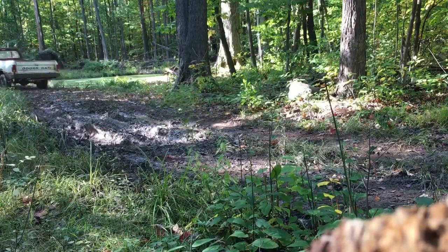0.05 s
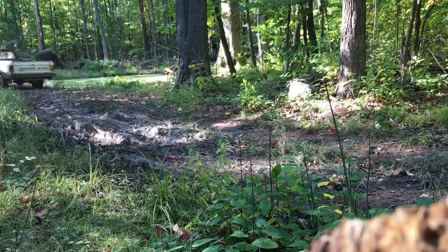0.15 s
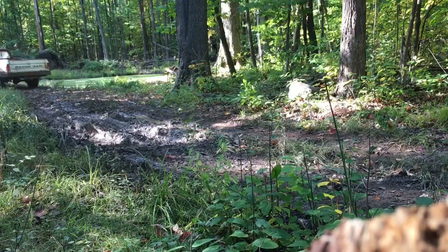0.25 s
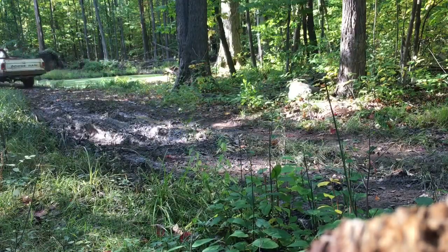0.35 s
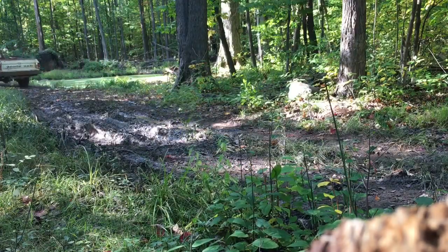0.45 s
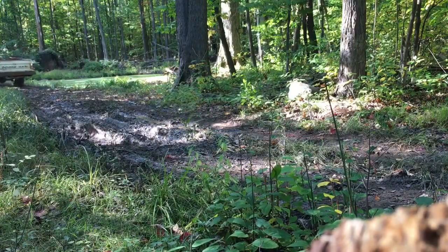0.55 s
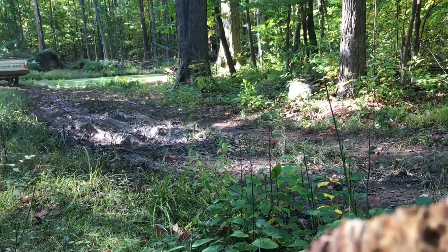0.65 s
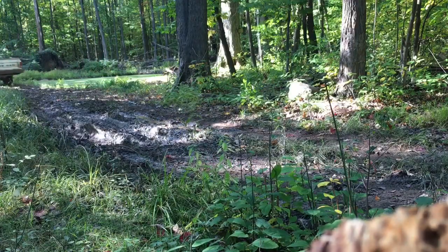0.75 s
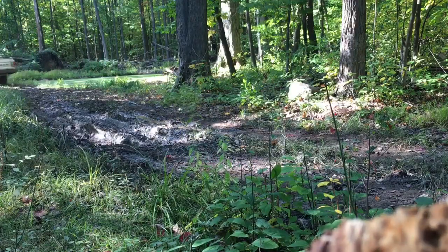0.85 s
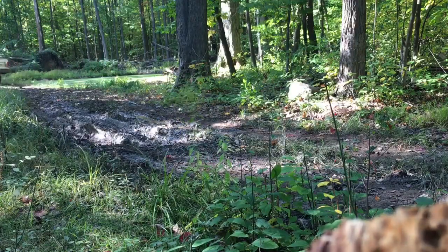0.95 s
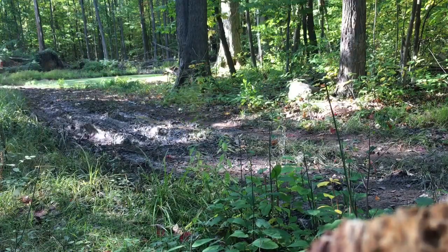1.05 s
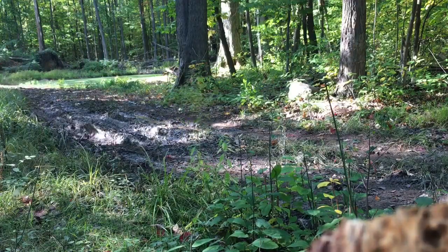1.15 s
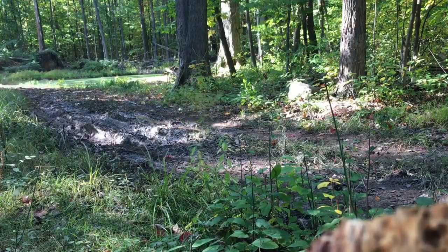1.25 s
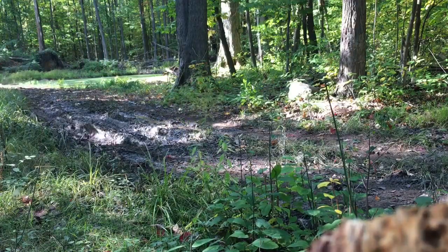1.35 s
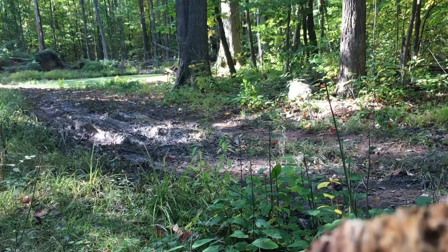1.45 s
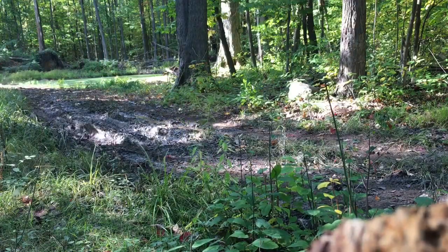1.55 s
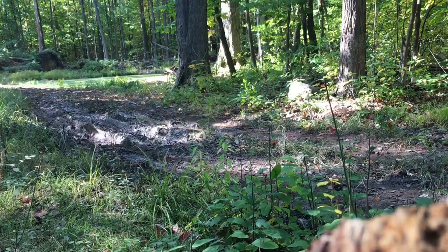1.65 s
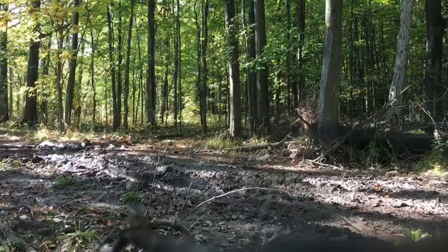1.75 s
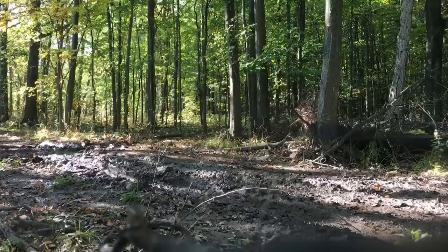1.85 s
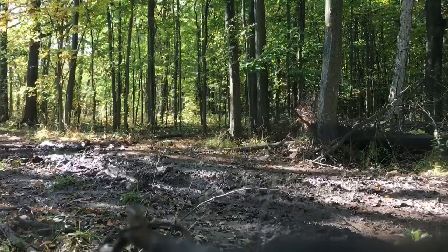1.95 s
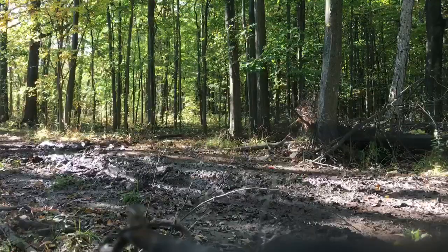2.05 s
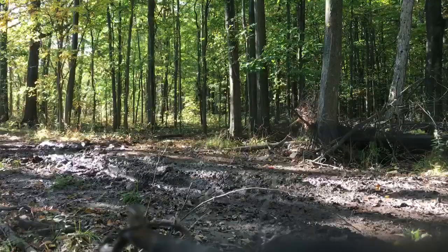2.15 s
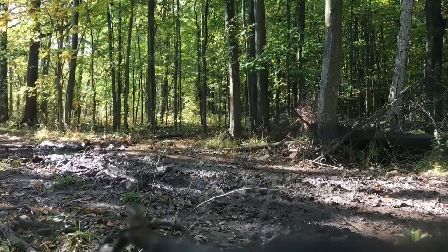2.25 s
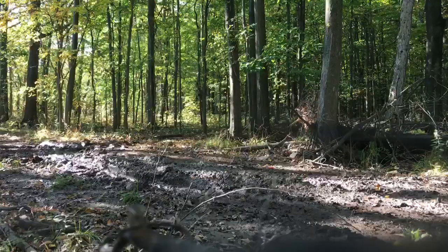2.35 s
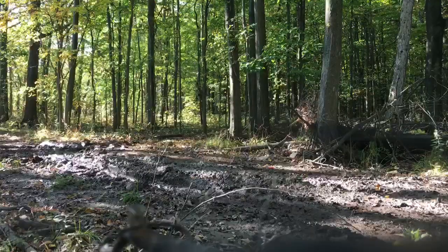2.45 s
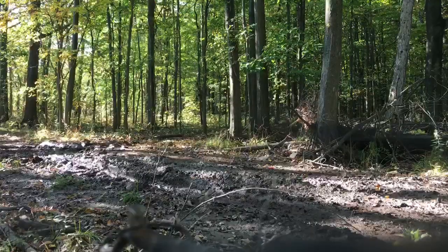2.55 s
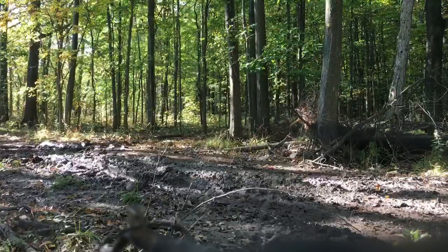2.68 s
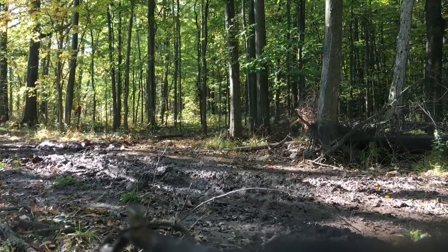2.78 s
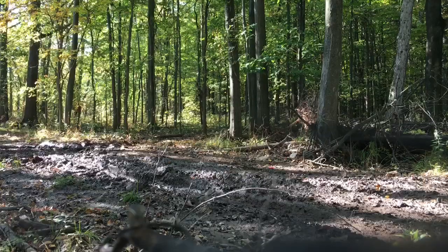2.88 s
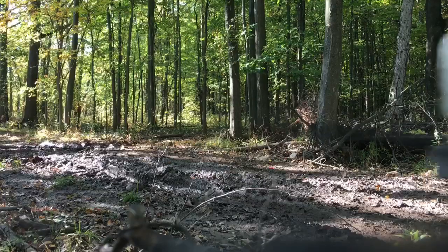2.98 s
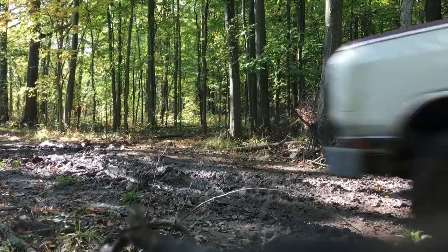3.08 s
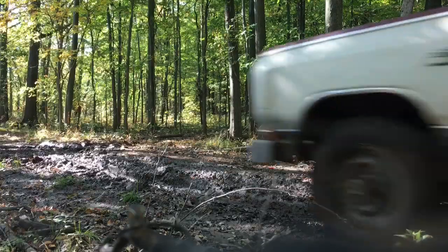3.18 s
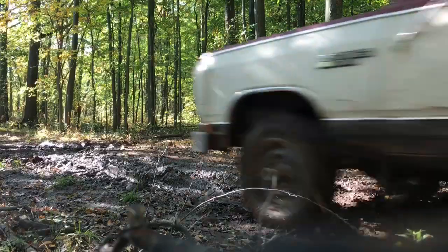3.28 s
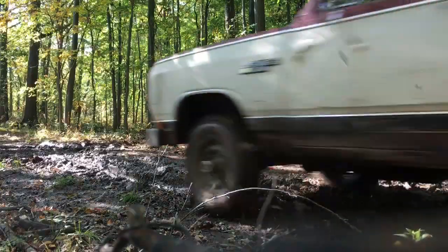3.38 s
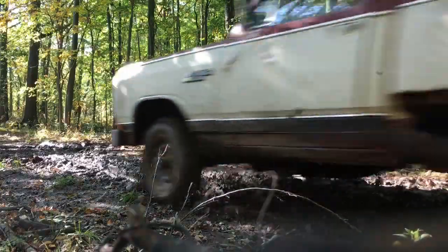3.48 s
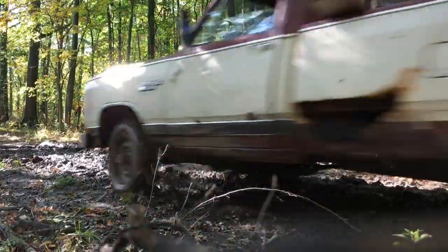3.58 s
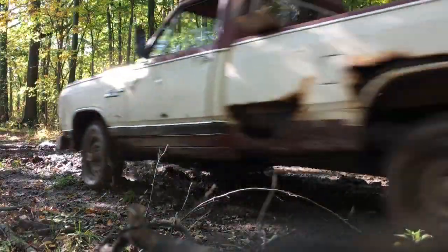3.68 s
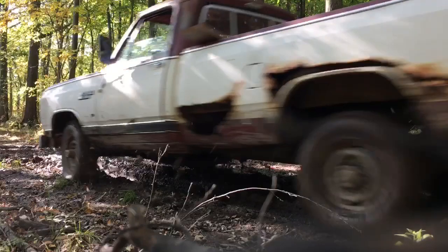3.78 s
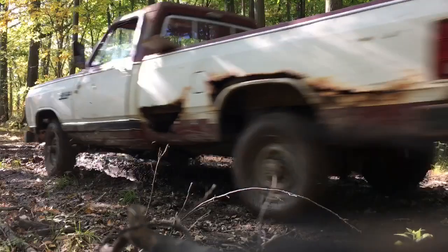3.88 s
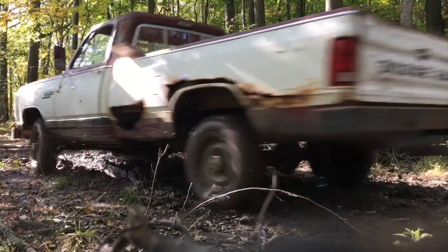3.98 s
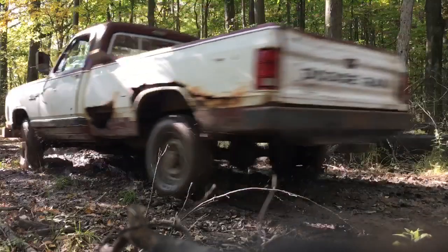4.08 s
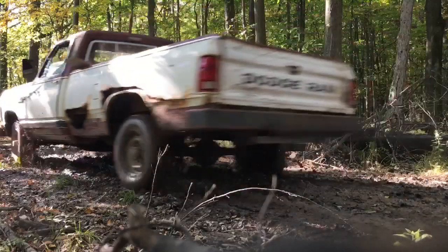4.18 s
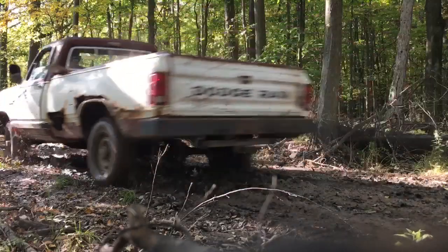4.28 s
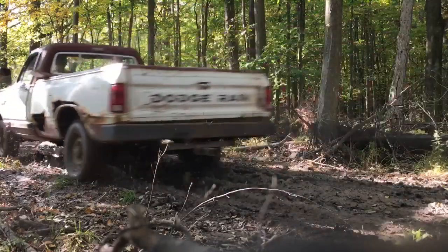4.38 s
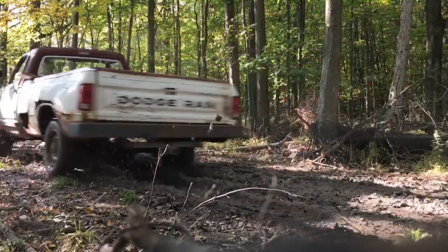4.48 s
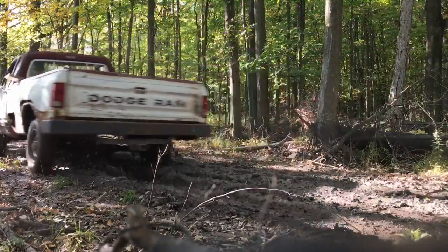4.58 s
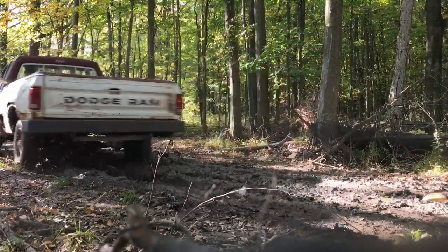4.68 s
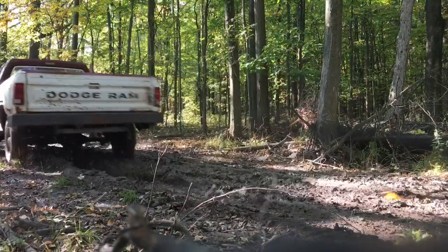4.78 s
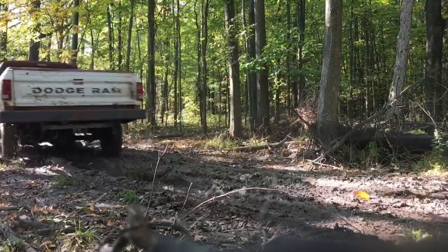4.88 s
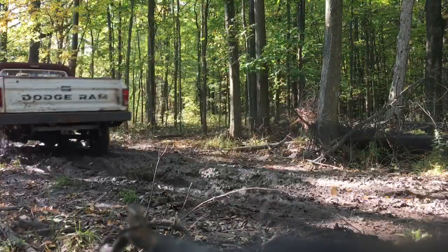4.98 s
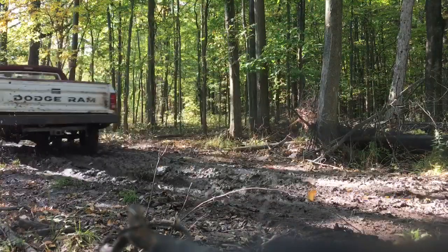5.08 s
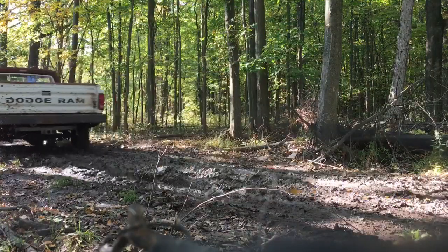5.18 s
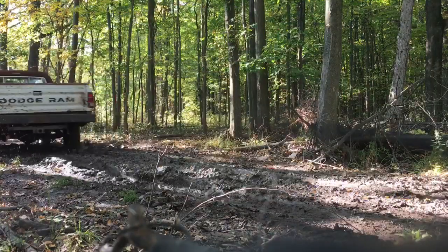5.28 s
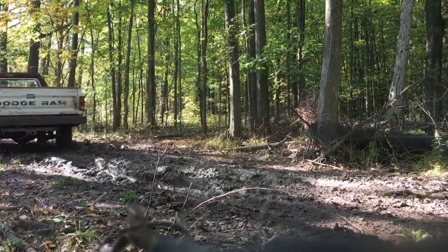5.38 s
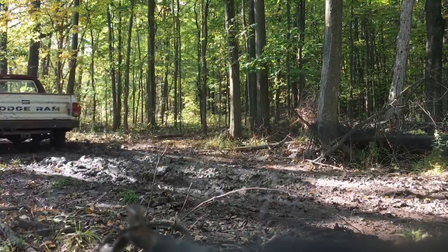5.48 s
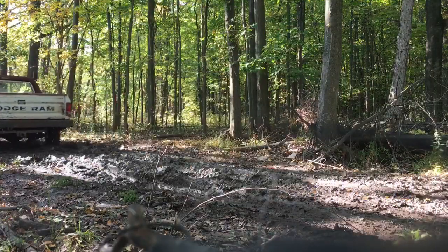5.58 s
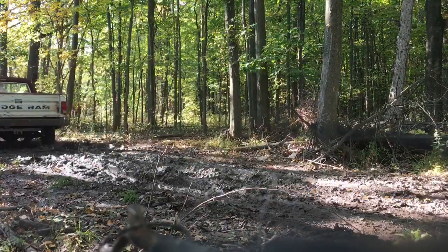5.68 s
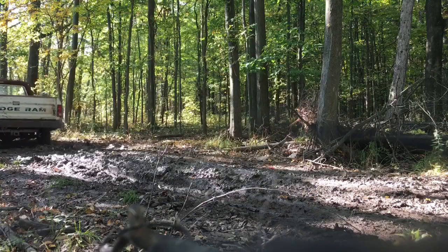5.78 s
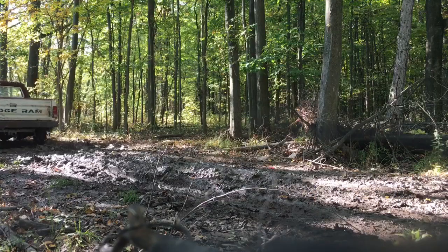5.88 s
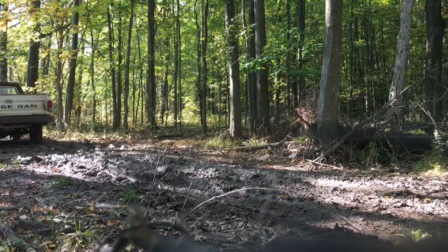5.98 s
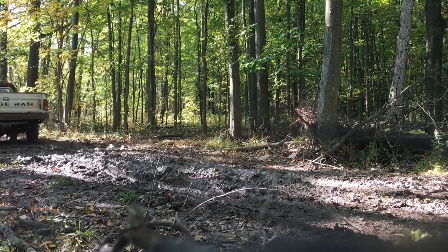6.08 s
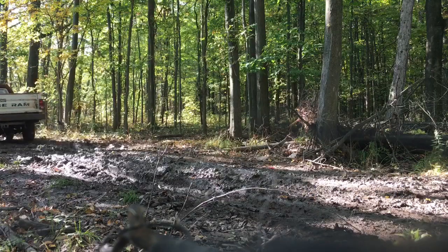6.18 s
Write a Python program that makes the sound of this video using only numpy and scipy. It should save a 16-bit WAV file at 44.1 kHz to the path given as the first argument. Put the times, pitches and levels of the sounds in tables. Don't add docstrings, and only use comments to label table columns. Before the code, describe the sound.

An old eight-cylinder pickup burbles away through woods, cuts abruptly, then roars close past with rattling panels and churning mud, pulling away with stuttering revs.

```python
import sys
import numpy as np
from scipy import signal
from scipy.io import wavfile
from scipy.ndimage import uniform_filter1d

SR = 44100
rng = np.random.default_rng(int(sys.argv[2]) if len(sys.argv) > 2 else 0)


def int16_out(signal):
    q = np.round(np.clip(np.atleast_2d(signal).T, -1, 1) * 32767)
    wavfile.write(sys.argv[1], SR, q.astype(np.int16))


def elevation(decibels):
    levels = np.asarray(decibels, float)
    return 10 ** (levels / 20)


N = 274724
TIME = np.arange(N) / SR
CUT_S = 1.702

# time in seconds, engine cycles per second (eight firings a cycle).
SPEED = [(0.0, 23.7), (0.24, 20.2), (0.64, 19.9), (0.81, 16.7), (1.12, 18.1), (1.26, 15.2), (1.69, 12.7),
         (1.71, 15.0), (2.5, 15.3), (2.9, 16.7), (3.2, 17.35), (4.0, 23.7), (4.6, 24.5), (5.45, 24.8),
         (5.71, 23.8), (5.8, 21.9), (6.0, 21.0), (6.23, 22.5)]
BANK = np.array([1, -1, .7, -.7, -1, 1, -.7, .7])
LAME = np.array([0, -.5, 0, 1, 0, -.5, 0, 1])
LEAKY = [0.034, 0.02, 0.91, 0.031, 0.045, 0.98, 0.076, 0.39]
# time in seconds, view (0 afar, 1 front, 2 behind).
VIEW = [(CUT_S, 0), (CUT_S + .001, 1), (3.0, 1), (3.55, 2)]
# time in seconds, pipes in dB, wheels in dB.
DRIVE = [(0, -29, -49.5), (.45, -27.5, -51), (.63, -31, -52), (.71, -37.5, -59), (.95, -33, -56),
         (1.3, -43, -62), (1.69, -51, -66.5), (1.712, -20, -43.5), (2.1, -19, -44.5), (2.45, -16, -41.5),
         (2.72, -17, -30), (3.05, -12.5, -25.5), (3.45, -18.5, -25.5), (3.8, -20.5, -35), (4.05, -25, -38),
         (4.45, -26.5, -41.5), (5.7, -27.5, -45), (6.23, -26, -42.5)]
# Hz, gain in dB.
COMMON_PATHS = [
    [(30, -31), (50, 4.5), (90, 0), (130, 7), (170, 4), (230, -14), (320, -24.5), (1000, -40.5),
     (3000, -60)],
    [(30, -23), (50, 35), (75, 22), (130, 12.5), (180, 14.5), (260, -2.5), (400, -16.5), (1000, -52),
     (3000, -88)],
    [(30, -38), (50, -5), (100, 10), (150, 3), (200, -2), (250, -7), (330, -15), (420, -25), (1000, -40.5),
     (3000, -48.5)],
]
# Hz, gain in dB.
BEAT_PATHS = [
    [(30, -66.5), (62, -2.5), (100, 0), (160, 3.5), (220, -1), (265, -5.5), (330, -24), (400, -16.5),
     (1000, -38), (3000, -66)],
    [(30, -40), (46, -31), (62, 2.5), (78, 0), (125, -10), (170, -13), (220, -9), (300, -18.5), (450, -35),
     (1000, -39), (3000, -63.5)],
    [(30, -24), (48, 5), (70, 8.5), (120, 4), (165, -3), (260, 2.5), (320, -2.5), (420, -9.5), (520, -28),
     (1000, -18), (3000, -60)],
]
# start in seconds, length in seconds, level in dB.
PULLS = [(.2, 0.28, -19), (.6, 0.058, -20), (.73, 0.19, -24.5), (.89, 0.22, -21.5), (1.19, 0.22, -27.5),
         (1.43, 0.13, -28), (2.2, 0.29, -22), (2.58, 0.15, -23), (2.8, 0.34, -14), (3.13, 0.32, -15),
         (3.47, 0.1, -18), (3.6, 0.23, -15), (3.85, 0.11, -18), (3.95, 0.185, -17.5), (4.55, 0.31, -23),
         (5.57, .06, -23), (5.83, 0.1, -19.5), (5.93, 0.115, -21), (6.05, .25, -20.5)]
# start in seconds, length in seconds, level in dB.
MISFIRES = [(-.05, 0.21, -24), (0.507, 0.11, -26), (.73, 0.091, -31), (0.98, 0.033, -28),
            (1.149, 0.052, -32), (1.28, 0.053, -37), (1.47, 0.055, -44), (2.67, 0.069, -26.5),
            (3.14, 0.2, -19), (3.783, 0.069, -20), (3.974, 0.076, -23.5), (4.116, 0.53, -24),
            (4.706, 0.45, -25), (5.269, 0.46, -23.5), (5.813, 0.088, -21), (5.965, 0.48, -21.5)]
# Hz, level in dB per Hz.
ROAR = [(150, 6.5), (300, 8.5), (430, -5.5), (560, 1), (700, -6), (900, -1), (1150, -8.5), (1350, -7.5),
        (1600, -5), (1900, -12), (2600, -69)]
# resonance in Hz, width in Hz, level in dB.
HOLLOWS = [(439, 58, -22.5), (700, 47, -19.5), (898, 31, -25), (1156, 100, -22)]
# start in seconds, length in seconds, change in dB.
ROAR_SWELLS = [(-.02, 0.026, 14), (0.056, 0.12, 9.5), (.28, .03, 7), (2.62, 0.34, 0.5), (3.193, 0.65, -3),
               (4.45, 0.17, 0.5), (5.194, 0.32, 3), (5.982, 0.34, 2), (4.175, 0.068, 4.5), (4.93, 0.18, 3.5),
               (5.54, 0.096, 5), (5.803, 0.078, 9.5)]
# Hz, level in dB per Hz.
CHURN = [(800, -17.5), (1300, -3.5), (1700, 2), (2400, 4), (3500, 2.5), (4300, -4), (5500, -16),
         (7500, -38)]
# Hz, level in dB per Hz.
SPRAY = [(2500, -25), (4000, -7.5), (5500, -2.5), (7000, -6.5), (7600, -10), (9000, -9), (10400, -17),
         (11500, -13.5), (15700, -23)]
# start in seconds, length in seconds, change in dB.
BITES = [
    (-.02, 0.014, 4),
    (.07, 0.041, 3.5),
    (.46, .17, 4),
    (.865, 0.25, 8),
    (2.3, .05, -1),
    (2.42, 0.17, 1),
    (5.0, .25, 1),
    (5.69, .1, -4.5),
    (5.87, 0.054, -2.5),
    (6.07, 0.021, 4),
]
# Hz, level in dB per Hz.
JET = [(2500, -53), (4500, 5), (6000, 3.5), (7600, -0.5), (9000, 1), (10400, -6.5), (12000, -3),
       (15700, -13)]
# resonance in Hz, width in Hz, level in dB.
PANELS = [(1550, 110, -2), (2150, 110, -3), (2330, 110, 4), (2520, 90, -3), (2840, 110, -1),
          (3100, 120, -5), (3650, 110, -5)]
# time in seconds, level in dB.
RATTLE = [(2.5, -60), (3.0, -29), (3.45, -26), (3.65, -24), (3.78, -25), (3.85, -36), (4.1, -35),
          (4.4, -48), (6.23, -50)]
# start in seconds, peak in dB, brightness in Hz, 60 dB decay in seconds.
SPLATS = [(0.0744, -30, 6000, 0.04), (0.276, -33, 5700, 0.04), (0.285, -16.5, 2600, 0.055),
          (0.5094, -39, 5970, 0.04), (0.8744, -34, 6040, 0.04), (2.3166, -20, 6000, 0.054),
          (2.3396, -16, 6030, 0.04), (2.4493, -13, 6000, 0.03), (4.3011, -23, 6000, 0.04),
          (4.4273, -4, 2600, 0.023), (4.5077, -28, 6000, 0.04), (4.9222, -23, 6000, 0.05),
          (5.7844, -31, 6000, 0.04), (5.813, -23, 6000, 0.04), (5.929, -18, 6000, 0.04),
          (6.0447, -30, 6000, 0.04), (6.0756, -19, 6000, 0.056)]
# start in seconds, level in dB, pitch in Hz, length in seconds.
TWEET = (5.125, -52, 15500, .04)

# dB per dB, then offset in dB from afar, from the front, from behind.
FIRING_LAW = (0.34, -16, -18.5, -17.5)
ROAR_LAW = (0.5139, -13.5, -10, -9)
CHURN_LAW = (0.81, -2.4, -3.9, -0.86)
LEAK_LAW = (.5, 13, 14, 10)

GUST_DB, GUST_S = 1.53, 0.017


def evened(x):
    return x / np.sqrt(np.mean(x ** 2) + 1e-20)


def read(points, hz):
    f, value = np.transpose(points)
    return np.interp(np.log(hz + 1), np.log(f + 1), value)


def curves(rows):
    s, *columns = np.transpose(rows)
    return [np.interp(TIME, s, column) for column in columns]


def seen(values):
    return np.interp(curves(VIEW)[0], range(len(values)), values)


def follow(control_db, law):
    return law[0] * control_db + seen(law[1:])


def waver(seconds):
    width = int(seconds * SR)
    drift = uniform_filter1d(rng.standard_normal(N), width)
    return evened(uniform_filter1d(drift, width))


def spells(rows, rise_s, fall_s):
    start, length, db = np.transpose(rows)[:, :, None]
    rise = (TIME - start) / rise_s + .5
    fall = (start + length - TIME) / fall_s + .5
    return np.clip(np.minimum(rise, fall), 0, 1), db


def causal(x, points):
    hz = abs(np.fft.fftfreq(16384, 1 / SR))
    log_gain = np.log(elevation(read(points, hz)))
    taps = np.fft.ifft(np.exp(np.conj(signal.hilbert(log_gain)))).real[:6000]
    return signal.oaconvolve(x, taps)[:N]


def resonate(x, hz, width):
    turn = np.exp(2j * np.pi * hz * TIME)
    r = np.exp(-np.pi * width / SR)
    return 2 * (turn * signal.lfilter([1 - r], [1, -r], x / turn)).real


def hiss(points, patchy_db):
    hz = np.fft.rfftfreq(512, 1 / SR)
    a, b, patches = rng.standard_normal((N // 128 + 5, 257, 3)).T
    patches = uniform_filter1d(patches, size=4, axis=0)
    patches = evened(uniform_filter1d(patches, size=30, axis=1))
    z = (a + 1j * b) * elevation(read(points, hz)[:, None] + patchy_db * patches)
    return evened(signal.istft(z, nperseg=512, noverlap=384)[1][:N])


def firings():
    cycle_hz = curves(SPEED)[0] * (1 + .007 * waver(.06))
    first = .33
    count = np.floor(8 * np.cumsum(cycle_hz) / SR - first).astype(int)
    at = np.flatnonzero(np.diff(count)) + 1
    return at, count[at] % 8


def exhaust_levels():
    edge_s, quiet_misfire_db = 0.053, -41.5
    pipes_db = curves(DRIVE)[0]
    pull, pull_db = spells(PULLS, edge_s, edge_s)
    miss, miss_db = spells(MISFIRES, edge_s, edge_s)
    pulling = pull.max(0)
    idle_tone = elevation(follow(pipes_db, FIRING_LAW) + 2.5 * waver(0.15))
    tone = idle_tone * (1 - pulling) + (pull * elevation(pull_db)).sum(0)
    lame = elevation(quiet_misfire_db) + (miss * elevation(miss_db)).sum(0)
    uneven = seen((.2, .08, .07)) * (1 - .7 * pulling)
    return np.array([20 * np.log10(tone), pipes_db, 20 * np.log10(lame)]), uneven


def exhaust(at, cylinder):
    levels_db, uneven = exhaust_levels()
    cycle_hz, levels_db = curves(SPEED)[0][at], levels_db[:, at]
    shares = [np.clip(1 - abs(curves(VIEW)[0] - k), 0, 1) for k in range(3)]
    patterns = [(8, 8, COMMON_PATHS), (5, 4.5, BEAT_PATHS), (6, 3, COMMON_PATHS)]
    pushes = []
    for level_db, (order, sum_gain, paths) in zip(levels_db, patterns):
        path_gain = sum(share[at] * elevation(read(path, order * cycle_hz)) for share, path in zip(shares, paths))
        pushes.append(elevation(level_db) / path_gain * SR / (cycle_hz * sum_gain * np.sqrt(2)))
    common, bank, miss = pushes
    common = common * np.clip(levels_db[0] - levels_db[2], -1, 1) + miss / 8
    chance = uneven[at] * rng.standard_normal((len(at), 3)).T
    rich = common * seen((.8, 0, 0))[at] * (cylinder == 2)
    lame = miss * np.array(LAME)[cylinder] * (1 + 2 * chance[1])
    both, beat = np.zeros((2, N))
    both[at] = common * (1 + chance[0]) + rich - lame
    beat[at] = bank * (np.array(BANK)[cylinder] + 2 * chance[2]) + rich / 3
    pipe = np.zeros(N)
    for share, common_path, beat_path in zip(shares, COMMON_PATHS, BEAT_PATHS):
        pipe -= causal(share * both, common_path) + causal(share * beat, beat_path)
    return pipe


def puffs(at, size, rise_s, fall_s):
    train, t = np.zeros(N), np.arange(2000) / SR
    train[at] = size
    shape = (1 - np.exp(-t / rise_s)) * np.exp(-t / fall_s)
    return evened(signal.oaconvolve(train, shape)[:N])


def noise_levels():
    rise_s, fall_s = 0.032, 0.097
    bite, roar_swell = (np.sum(np.multiply(*spells(rows, rise_s, fall_s)), 0) for rows in (BITES, ROAR_SWELLS))
    wheels_db = curves(DRIVE)[1] + bite
    roar_db = follow(wheels_db, ROAR_LAW) + roar_swell + GUST_DB * waver(GUST_S)
    churn_db = follow(wheels_db, CHURN_LAW) + GUST_DB * waver(GUST_S)
    leak_db = follow(wheels_db, LEAK_LAW) + 2.5 * waver(GUST_S)
    return roar_db, churn_db, wheels_db, np.minimum(leak_db, 4)


def exhaust_roar(throb):
    roar = hiss(ROAR, 1.56) * (0.72 + 0.27 * throb)
    return roar + sum(elevation(db) * evened(resonate(roar, hz, width)) for hz, width, db in HOLLOWS)


def tyre_churn(leak, chuff):
    return hiss(CHURN, 1) * (1 + .25 * leak * chuff) / np.sqrt(1 + 0.93 * leak)


def spray_and_leak(leak, chuff):
    return (hiss(SPRAY, 2.8) + leak * chuff * hiss(JET, 0.44)) / np.sqrt(1 + leak ** 2)


def panel_rattle(chuff):
    drift_db = 1.8 * evened(uniform_filter1d(rng.standard_normal(N), size=900))
    shake = (1.2 + chuff) * rng.standard_normal(N) * elevation(drift_db)
    return evened(sum(elevation(db) * np.sqrt(1 / width) * resonate(shake, hz, width) for hz, width, db in PANELS))


def running_noise(at, cylinder):
    roar_db, churn_db, spray_db, leak_db = noise_levels()
    luck = elevation(1.9 * np.clip(rng.standard_normal((len(at), 2)), -2, 2))
    throb = puffs(at, luck[:, 0] * (1 + 0.85 * np.array(BANK)[cylinder]), 0.0069, 0.0077)
    chuff = puffs(at, luck[:, 1] * np.array(LEAKY)[cylinder], 0.0011, 0.0043)
    leak = elevation(leak_db)
    mix = elevation(roar_db) * exhaust_roar(throb)
    mix += elevation(churn_db) * tyre_churn(leak, chuff)
    mix += elevation(spray_db) * spray_and_leak(leak, chuff)
    return mix + elevation(curves(RATTLE)[0]) * panel_rattle(chuff)


def mud():
    out, t = np.zeros(N + 8000), np.arange(8000) / SR
    for s, peak_db, hz, t60 in SPLATS:
        envelope = elevation(peak_db - 9.0 - 60 * t / t60) * np.minimum(t / 0.00081, 1)
        burst = rng.standard_normal(len(t)) * envelope
        band = signal.butter(2, [min(0.17 * hz, 9000), min(1.85 * hz, 14000)], "band", fs=SR)
        out[round(s * SR):][:len(t)] += signal.lfilter(*band, burst)
    return out[:N]


def squeak():
    s, db, hz, length = TWEET
    swell = np.exp(-((TIME - s - length / 2) / (length / 3)) ** 2)
    return elevation(db) * swell * np.sin(2 * np.pi * hz * TIME)


def woods(x, t60):
    t = np.arange(SR // 2) / SR
    trunks = rng.choice([-1., 1.], len(t)) * (rng.random(len(t)) < .04)
    taps = trunks * elevation(-60 * t / t60) * (t > .006)
    return signal.fftconvolve(x, taps / np.linalg.norm(taps))[:N]


def scene():
    at, cylinder = firings()
    noise = running_noise(at, cylinder) + mud() + squeak()
    pipe = exhaust(at, cylinder)
    pipe_echo = elevation(-18) * woods(pipe, .3)
    noise_echo = elevation(-10.0) * woods(noise, 0.83)
    return (pipe + pipe_echo + noise + noise_echo)[None]


def low_pass(x):
    return signal.sosfilt(signal.butter(12, 15730, fs=SR, output="sos"), x)


def record(dry):
    fade = np.where(TIME < CUT_S, (CUT_S - TIME) / 0.043, (TIME - CUT_S) / 0.029)
    x = signal.lfilter(*signal.butter(2, 28, "high", fs=SR), dry) * np.clip(fade, 0, 1)
    held = x / (1 + abs(x / .97) ** 4) ** .25
    return low_pass(held)


dry = scene()
out = record(dry)
int16_out(out)
```